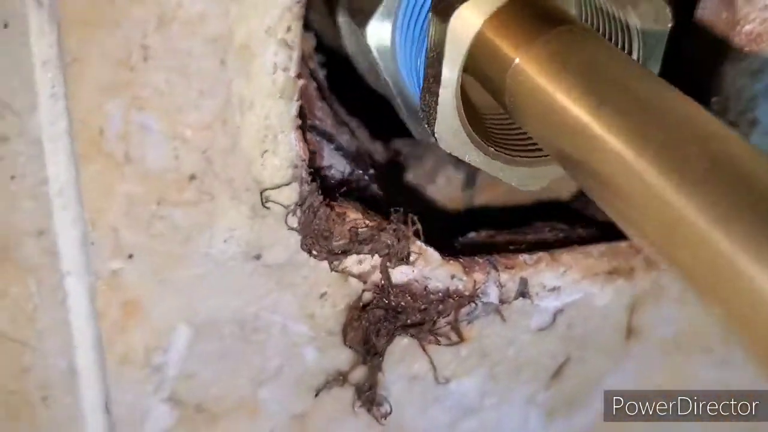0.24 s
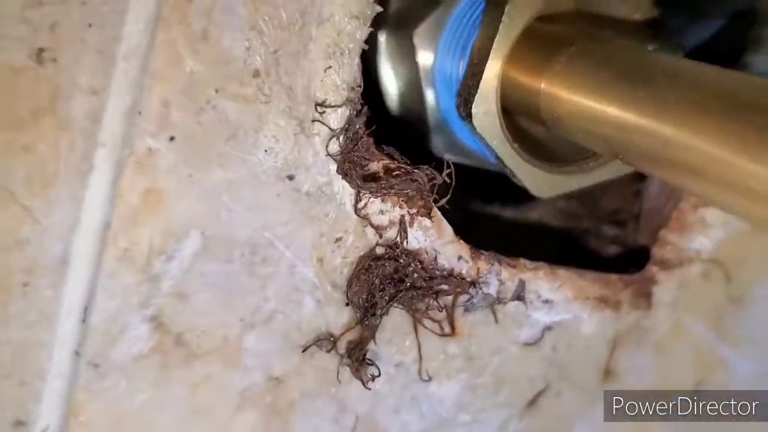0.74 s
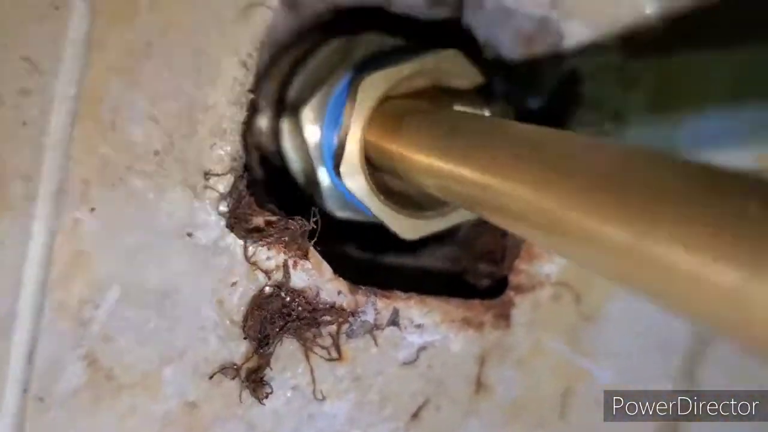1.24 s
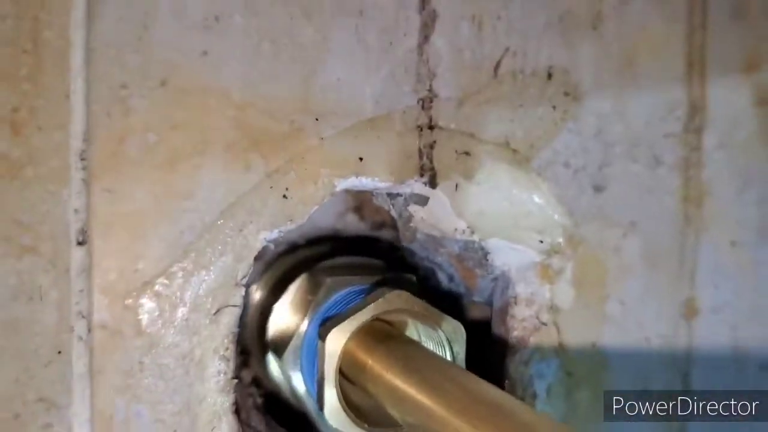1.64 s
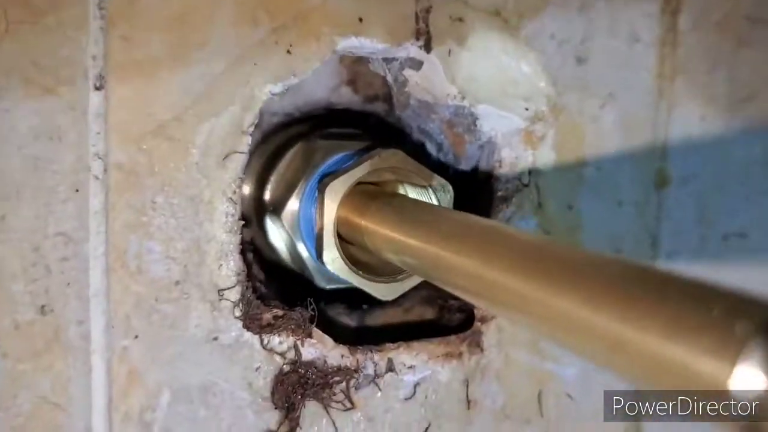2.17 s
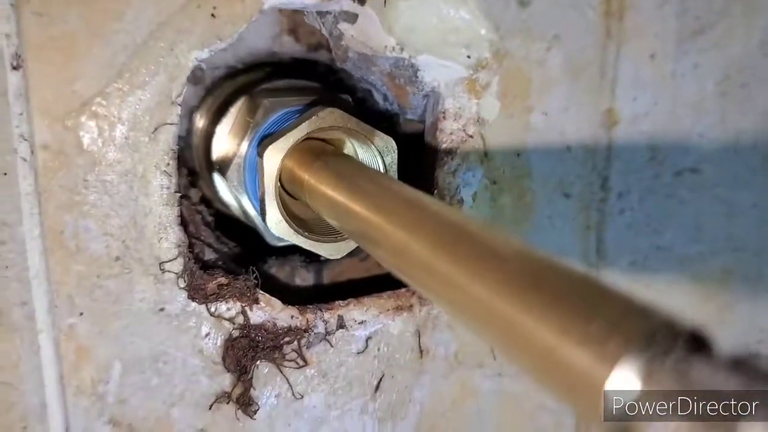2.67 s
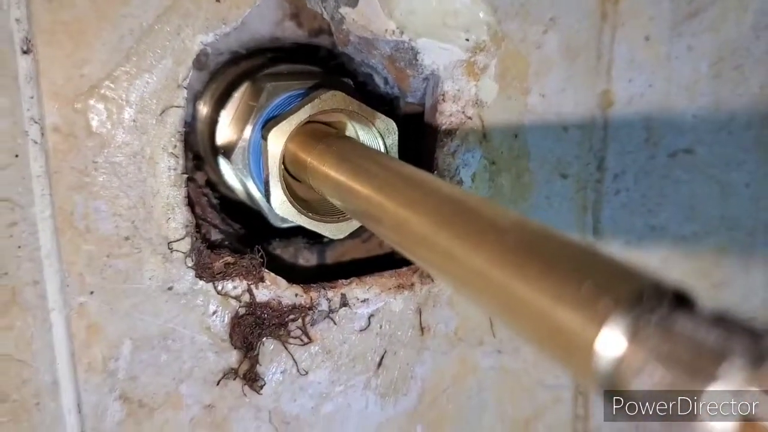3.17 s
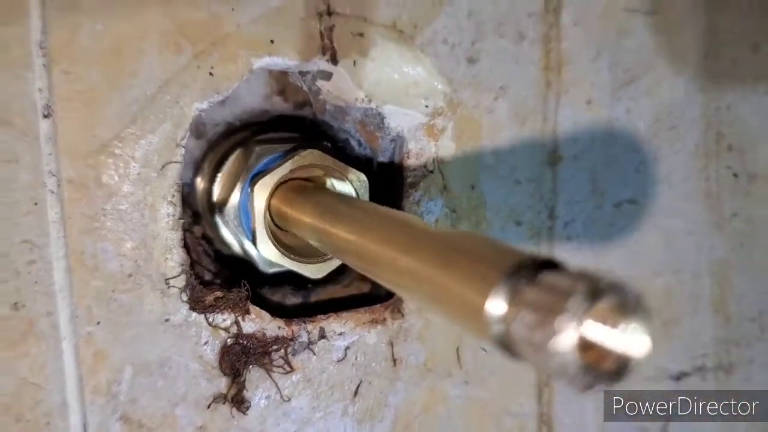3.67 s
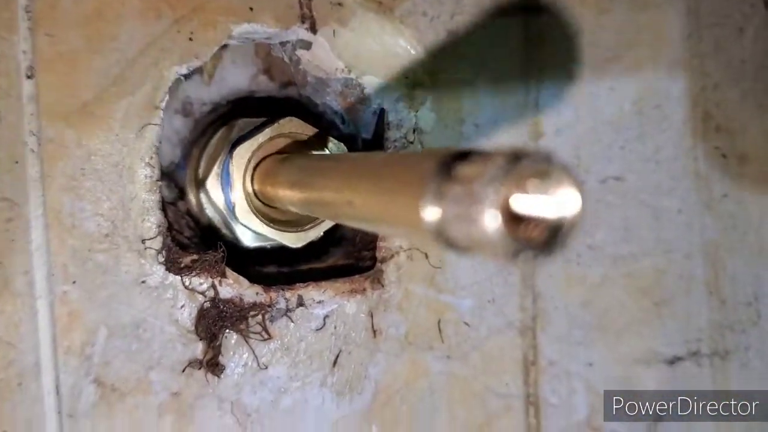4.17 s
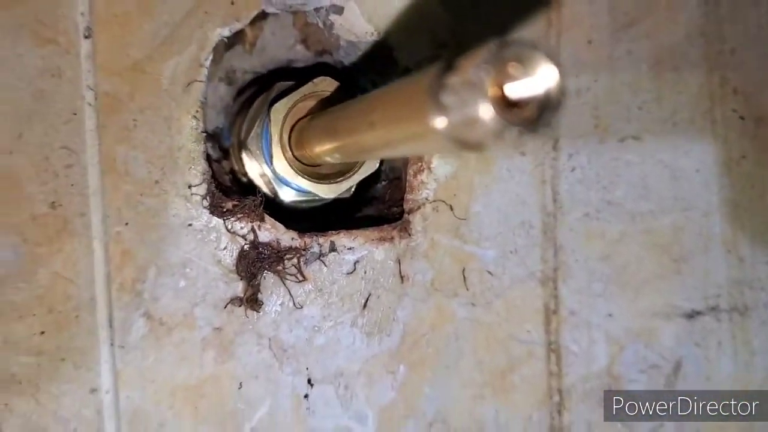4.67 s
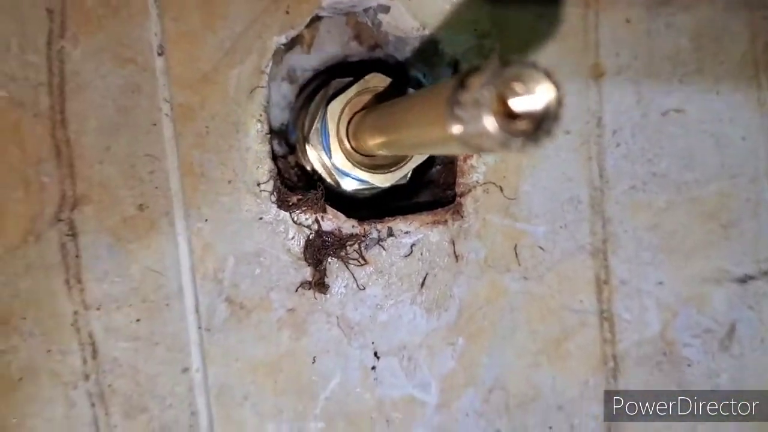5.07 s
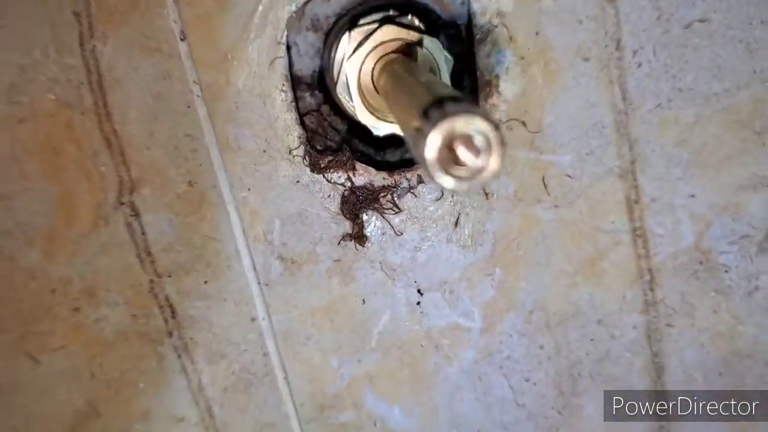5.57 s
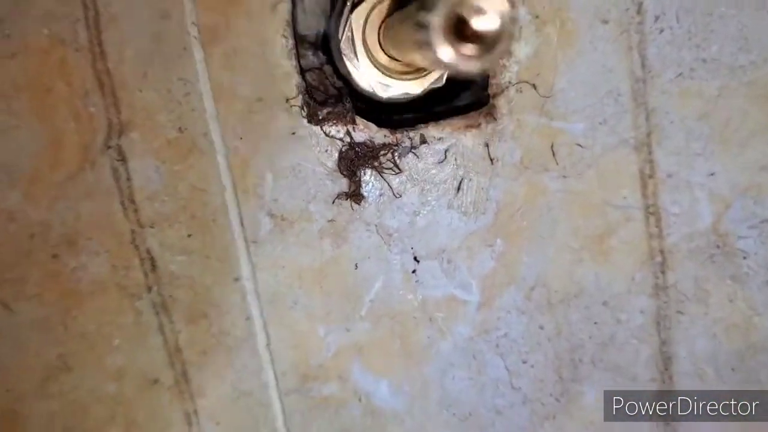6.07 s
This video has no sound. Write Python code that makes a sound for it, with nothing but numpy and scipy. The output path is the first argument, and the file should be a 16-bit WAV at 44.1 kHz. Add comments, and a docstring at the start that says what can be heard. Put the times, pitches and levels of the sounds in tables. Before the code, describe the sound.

A close, steady hiss of water in wall pipes, while a foot shuffles and thumps in a hollow bathtub.

```python
"""A steady hiss of water in the supply pipes behind a tiled bathroom wall, close up on the two
microphones of a hand-held camera; its colour shifts as the camera moves around the pipes.
A thin whistle comes and goes, and the hollow tub hums with the flow. The tub scrapes and booms under
a shuffling foot, thuds under small shifts of weight and groans once near the end.
Right at the microphones, fingers tap and brush the camera body."""
import sys
import numpy as np
from scipy import signal
from scipy.io import wavfile
from scipy.ndimage import uniform_filter1d

SR = 44100
rng = np.random.default_rng(int(sys.argv[2]) if len(sys.argv) > 2 else 0)


def to_wav(s):
    """Save 16-bit WAV."""
    ch = np.atleast_2d(s).T  # columns
    pcm = np.round(np.clip(ch, -1, 1) * 32767)  # PCM
    wavfile.write(sys.argv[1], SR, pcm.astype(np.int16))


N = 278705

# The flow from where the camera is; every pan is left minus right.
# time_s, hiss_db, treble_pan_db, bass_shift_db, whistle_db
FLOW = [(0.0, -33.5, -1, 4, -45.5), (0.37, -32.3, -0.5, 5.5, -47.5), (0.6, -32, -1, 3.5, -42),
        (1.05, -32.5, -1, 3, -43.5), (1.4, -34.5, 0.5, 8, -49), (1.85, -34.5, -2, 8.5, -47.5),
        (2.05, -35.5, 0, 3.5, -52), (2.67, -35, 0, 1, -49), (3.3, -31, -0.5, -0.5, -41),
        (3.7, -30, -2, 0, -45), (4.15, -29, -2, -3.5, -44.5), (4.7, -31, -1.5, 0, -48),
        (5.05, -31.5, 0, 3, -58), (5.45, -32, 3.5, 3, -48), (5.75, -32, 1.5, 0, -50),
        (6.12, -32.5, 3.5, 3, -51), (6.24, -33.5, 0, 6, -39), (6.32, -32.5, 3, -1, -44)]
# Modes of the tub's panel: pitch_hz, width_hz, gain_db
PANEL_MODES = [(296.3, 11, 1.5), (330, 49, -11.5), (403, 110, -11.5), (538, 53, -9), (726, 42, -19)]


def pipe_hiss(patchy_db=1.5, ripple_db=2.5, flicker_db=0.72, knee_hz=1500, direct=0.63, path_turns=0.6):
    """Turbulent water in the pipes: noise whose colour follows the aim of the camera."""
    # Camera path: time_s, aim (0 close to the wall, 1 along the pipe, 2 facing the pipe end)
    camera_path = [(0, 0.33), (.8, 0.42), (1.6, 0.076), (2.5, 0.7), (3.3, 0.48), (4.3, 1.43), (4.9, 1.68),
                   (5.7, 1.9), (6.32, 1.92)]
    # The hiss spectrum from those three positions: frequency_hz, relative_db
    at_wall = [(76, -26), (130, -22), (183, -35), (285, -15.5), (322, -33), (402, -18.5), (601, -27),
               (1400, -21), (1710, -19), (2180, -19), (3070, -13), (5850, -13.5), (9670, -19), (12600, -14),
               (16000, -16)]
    along_pipe = [(76, -23), (130, -5.5), (147, -34), (219, -16), (253, -15.5), (453, -20), (491, -29),
                  (935, -28.5), (1750, -16), (2090, -22.5), (2670, -18), (7440, -12.5), (10100, -23),
                  (12100, -13.5), (16000, -20)]
    at_pipe_end = [(76, -24), (130, -4.5), (176, -23.5), (651, -22), (881, -29), (1710, -17.5),
                   (1970, -23.5), (2720, -12), (2950, -15.5), (4500, -14), (7150, -19), (7750, -17),
                   (8920, -23), (11100, -18), (16000, -21.5)]
    # Pipe and wall cavity resonances, and one dip: pitch_hz, width_hz, gain_db, pan_db
    pipe_modes = [(222.4, 24.5, 12.5, 7), (310.1, 26.7, 13, -3), (451, 56, 6, 8), (1397, 230, 5.5, 0),
                  (1753, 14, 11.5, 14.5), (2246, 19, 7, -9), (2746, 72, 6, 5), (3670, 130, 4, 4.5),
                  (4260, 110, 2.5, 1), (4480, 98, 1.5, 1), (4940, 89, -4, 1), (6105, 33, 2, -4),
                  (6440, 770, 2, -5), (8520, 99, 2.5, 13), (10700, 870, 5, 0.5), (10950, 81, 6.5, 17.5),
                  (11360, 130, 4.5, -12.5), (12240, 330, 5.5, -9)]
    # Balance of the hiss between the microphones: frequency_hz, pan_db
    balance = [(60, 27), (110, -4), (200, -3), (380, 0.5), (700, -5.5), (1290, 2.5), (2380, -3),
               (4400, -3.5), (8120, -0.5), (15000, 0)]
    # How alike the two microphones hear it: frequency_hz, correlation
    likeness = [(60, 0.16), (130, 0.98), (290, 0.74), (640, 0.086), (1410, -0.22), (3100, -0.32),
                (6820, 0.07), (15000, 0.15)]
    frames = N // 512 + 5
    t = np.arange(frames) * 512 / SR
    hz = np.fft.rfftfreq(2048, 1 / SR)[:, None]
    time_s, hiss_db, treble_pan_db, bass_shift_db, _ = np.transpose(FLOW)
    a, b, c, d = rng.standard_normal((frames, 1025, 4)).T
    left, unrelated = a + 1j * b, c + 1j * d
    patches = smooth_field(frames, bins_wide=24, frames_long=16)
    ripples = smooth_field(frames, bins_wide=3, frames_long=120)  # tile echoes interfere: lasting peaks
    paths = smooth_field(frames, bins_wide=30, frames_long=150)[0]  # path difference to the mics drifts
    aim = np.interp(t, *np.transpose(camera_path))
    views = enumerate((at_wall, along_pipe, at_pipe_end))
    colour_db = sum(np.maximum(1 - abs(aim - k), 0) * curve_at(view, hz) for k, view in views)
    pan_db = curve_at(balance, hz)
    for pitch_hz, width_hz, gain_db, mode_pan_db in pipe_modes:
        peak = 1 / (1 + (2 * (hz - pitch_hz) / width_hz) ** 2)
        colour_db += gain_db * peak
        pan_db += mode_pan_db * peak
    top = (hz > 3500) & (hz < 15000)
    colour_db -= 10 * np.log10((top * amp(2 * colour_db)).sum(0))  # equal top-end power at every aim
    treble = 1 / (1 + (knee_hz / (hz + 1)) ** 2)
    colour_db += (1 - treble) * np.interp(t, time_s, bass_shift_db)
    texture_db = patchy_db * patches + ripple_db * ripples + flicker_db * rng.standard_normal(frames)
    pan_db = pan_db + treble * np.interp(t, time_s, treble_pan_db)
    path_phase = np.exp(2j * np.pi * path_turns * paths)
    coherence = (1 - treble) * curve_at(likeness, hz) + treble * direct * path_phase
    right = coherence * left + np.sqrt(np.clip(1 - abs(coherence) ** 2, 0, 1)) * unrelated
    spectra = np.array([left, right]) * amp(colour_db + texture_db) * sides(pan_db)
    hiss = signal.istft(spectra, nperseg=2048, noverlap=1536)[1][:, :N]
    return amp(np.interp(np.arange(N) / SR, time_s, hiss_db)) * unit_rms(hiss)


def pipe_whistle(pitch_hz=7647, waver_db=1, pan_db=-8.5):
    """One narrow pipe resonance sings in the flow, coming and going."""
    time_s, *_, whistle_db = np.transpose(FLOW)
    tone = ring(rng.standard_normal((2, N)), [(pitch_hz, 160, 0)])
    tone = unit_rms(ring(tone, [(pitch_hz, 250, 0)]))
    level_db = np.interp(np.arange(N) / SR, time_s, whistle_db) + waver_db * waver(span=3000)
    return amp(level_db) * tone * sides(pan_db)[:, None]


def foot_scrapes(mix, land_s=0.025, tail_s=0.11, tail_db=-19.5, grit_db=1.5, correlation=-0.19):
    """A sole lands, drags over the tub and lifts; tub and room keep a faint tail."""
    # Strokes of the sole: start_s, length_s, bright_db, hollow_db, panel_db, pan_db
    strokes = [(1.311, 0.098, -27.5, -26.5, -20.5, -7), (1.448, 0.14, -24, -35, -34.5, -9)]
    # Tub resonances in the bright and the hollow part of the scrape: pitch_hz, width_hz, gain_db
    bright_modes = [(1480, 150, 1.5), (1790, 150, 2.5), (2195, 120, 6), (2340, 71, 4), (2904, 97, 6)]
    hollow_modes = [(788, 30, 5), (860, 53, -11), (1060, 76, -3), (1330, 105, 2)]
    hollow_db_per_s, panel_db_per_s, lift_db_per_s = -77, -140, -420
    for start_s, length_s, bright_db, hollow_db, panel_db, pan_db in strokes:
        t = np.arange(0, length_s + tail_s, 1 / SR)
        landing_db = -20 * np.maximum(1 - t / land_s, 0) ** 2
        landed_s, lifted_s = np.maximum(t - land_s, 0), np.maximum(t - 0.98 * length_s, 0)
        bright_db += np.maximum(-13.5 * abs(2 * t / length_s - 1) ** 1.65, tail_db)  # swells and sinks
        fade_db = hollow_db_per_s * landed_s + lift_db_per_s * lifted_s
        hollow_db += landing_db + np.maximum(fade_db, tail_db)
        panel_db += landing_db + panel_db_per_s * landed_s
        grit = amp(grit_db * unit_rms(uniform_filter1d(rng.standard_normal(SR // 2), 90)))
        a, b, c, d = (rng.standard_normal((4, SR // 2)) * grit)[:, :len(t)]
        friction = np.array([a, correlation * a + (1 - abs(correlation)) * b])
        shaking = np.array([c + 0.43 * d, c - 0.35 * d])
        bright = amp(bright_db) * unit_rms(band(ring(friction, bright_modes), 1400, 3140, order=6))
        hollow = amp(hollow_db) * unit_rms(band(ring(friction, hollow_modes), 790, 1650))
        panel = amp(panel_db) * unit_rms(band(ring(shaking, PANEL_MODES), 178, 440))
        scrape = bright * sides(pan_db)[:, None] + hollow * sides(pan_db - 2.5)[:, None] + panel
        add(mix, start_s, scrape * signal.windows.tukey(len(t), 0.05))


def floor_booms(mix, rise_s=0.013, fall_s=0.018, sag_db=-8.5):
    """The tub floor booms in jerks under the foot, lower as it is loaded, alike at both microphones."""
    # Jerks of the floor: start_s, length_s, pitch_hz, glide_hz_per_s, level_db
    jerks = [(1.336, 0.074, 111.5, -110, -5.5), (1.405, 0.053, 118, -150, -10),
             (1.462, 0.064, 108.7, -450, -7), (1.518, 0.078, 81, -200, -10), (1.608, 0.09, 69.5, 15, -23.5)]
    for start_s, length_s, pitch_hz, glide_hz_per_s, level_db in jerks:
        t = np.arange(0, length_s, 1 / SR)
        edges = np.clip(np.minimum(t / rise_s, (length_s - t) / fall_s), 0, 1)
        envelope = np.sin(np.pi / 2 * edges) * amp(level_db + sag_db * t / length_s)
        add(mix, start_s, envelope * np.sin(2 * np.pi * (pitch_hz + glide_hz_per_s * t / 2) * t))


def tub_thuds(mix, boom_hz=110.2):
    """Shifts of weight land as soft blows: a short scuff rings the panel over a low boom."""
    # Blows on the tub: time_s, level_db, pan_db, boom_db, brightness_db
    blows = [(0.345, -29, -13, -34, -12), (1.112, -21.5, 4, -23.5, -8), (2.092, -41.5, 4, -33, 14.5),
             (2.187, -36.5, 0, -35, 4), (2.255, -39, -6, -28.5, -6), (2.368, -33, 2, -43, -23),
             (5.039, -40, -1, -44, -6), (5.086, -23, -6.5, -23.5, -2), (5.214, -35.5, -7, -37, -15),
             (5.316, -30, -5, -25, -12), (5.44, -28, -5, -20.5, -2), (5.619, -49, -13, -35, -8)]
    t = np.arange(6000) / SR
    for time_s, level_db, pan_db, boom_db, brightness_db in blows:
        scuff = rng.standard_normal((2, len(t))) * (1 - np.exp(-t / 0.001)) * np.exp(-t / 0.015)
        panel = ring(scuff.mean(0), PANEL_MODES)
        contact = band(scuff, 250, 4200, order=2)
        blow = panel / abs(panel).max() + amp(brightness_db) * contact / abs(contact).max()
        boom = amp(boom_db) * np.sin(2 * np.pi * boom_hz * t) * np.exp(-t / 0.03)
        add(mix, time_s - 0.002, amp(level_db) * blow * sides(pan_db)[:, None] + boom)


def finger_taps(mix):
    """Taps on the camera click and rattle at both microphones; the right gets case ring and a push."""
    # Fingertips on the body: start_s, left_click_db, right_click_db, case_db, push_db
    taps = [(0.2709, -14, -19, -21, -26), (0.2767, -1, -10, -8.5, -12.5), (0.9835, -2.5, -3, -3, -6),
            (.991, -11, -25, -31, -13)]
    t = np.arange(3000) / SR
    bright_click = np.sin(2 * np.pi * 2400 * t) * np.exp(-((t - 0.00036) / 0.00017) ** 2)
    dull_click = np.sin(2 * np.pi * 1250 * t) * np.exp(-((t - 0.0006) / 0.00022) ** 2)
    case = np.sin(2 * np.pi * 590 * (t - 0.0008)) * np.exp(-t / 0.0024) * (1 - np.exp(-t / 0.0006))
    push = np.sin(2 * np.pi * 63 * t) * np.exp(-((t - 0.014) / 0.0066) ** 2)  # slow pressure pulse
    for start_s, left_click_db, right_click_db, case_db, push_db in taps:
        rattle = rng.standard_normal((2, len(t))) * np.exp(-t / 0.0047)
        left = amp(left_click_db) * (bright_click + band(0.35 * rattle[0], 720, 3900))
        right = amp(right_click_db) * (dull_click + band(0.045 * rattle[1], 240, 3500, order=3))
        right += amp(case_db) * case + amp(push_db) * push
        add(mix, start_s, np.array([left, right]))


def finger_brushes(mix):
    """Skin slides past a microphone port: short swells of rough noise."""
    # Passes of a finger: peak_s, level_db, centre_hz, low_hz, high_hz, length_s, pan_db
    brushes = [(4.672, -44, 900, 400, 1500, 0.026, 0), (4.796, -37.5, 700, 292, 4030, 0.045, -23),
               (6.014, -28.5, 1960, 1390, 3300, 0.014, 21), (6.071, -36, 2080, 990, 3200, 0.017, 11)]
    t = np.arange(-3000, 3000) / SR
    for peak_s, level_db, centre_hz, low_hz, high_hz, length_s, pan_db in brushes:
        rub = ring(rng.standard_normal((2, len(t))), [(centre_hz, 900, 0)])
        rub = unit_rms(band(rub, low_hz, high_hz, order=3))
        swell = np.exp(-abs(2 * t / length_s) ** 1.6)
        add(mix, peak_s + t[0], amp(level_db) * rub * swell * sides(pan_db)[:, None])


def panel_groan(length_s=0.384, first_hz=292.3, settled_hz=274, settle_s=0.043, roughness=0.41):
    """Slow uneven slip keeps one panel mode sounding; its pitch settles as it fades."""
    t = np.arange(0, length_s, 1 / SR)
    pitch_hz = settled_hz + (first_hz - settled_hz) * np.exp(-t / settle_s)
    level_db = -42 - 6.5 * t / length_s + 2 * waver(span=600)[:len(t)]
    noise = unit_rms(band(rng.standard_normal(SR), 274, 320, order=2))[:len(t)]
    tone = np.sqrt(2) * np.sin(2 * np.pi * np.cumsum(pitch_hz) / SR) + roughness * noise
    return amp(level_db) * tone * signal.windows.tukey(len(t), 0.2)


def tub_hum(offset_db=-5.5):
    """The flow shakes the tub's lowest modes, alike at both microphones."""
    # Low modes of the tub: pitch_hz, width_hz, gain_db
    tub_modes = [(69.05, 5.1, 6.5), (105.1, 11.5, 3.5), (115.2, 6.8, 1.5)]
    hum = ring(ring(rng.standard_normal(N), tub_modes), [(76, 41.4, 0)])
    return amp(flow_db(bass_share=0.36) + offset_db) * unit_rms(low_cut(hum, 55))


def low_rumble(offset_db=-15, waver_db=3):
    """One deep resonance follows the flow and also swells on its own, alike at both microphones."""
    deep = band(ring(rng.standard_normal(N), [(58.7, 8.8, 0)]), 49, 62.7, order=2)
    swell_db = waver_db * waver(span=8000)
    return amp(flow_db(bass_share=-0.43) + offset_db + swell_db) * unit_rms(deep)


def flow_db(bass_share):
    """The hiss level plus a share of its bass shift, sample by sample."""
    time_s, hiss_db, _, bass_shift_db, _ = np.transpose(FLOW)
    return np.interp(np.arange(N) / SR, time_s, hiss_db + bass_share * bass_shift_db)


def amp(db):
    return 10 ** (np.asarray(db) / 20)


def unit_rms(x):
    return x / np.sqrt(np.mean(x ** 2) + 1e-20)


def curve_at(points, hz):
    """Interpolates (frequency_hz, value) points on a log frequency axis."""
    point_hz, value = np.transpose(points)
    return np.interp(np.log(hz + 1), np.log(point_hz + 1), value)


def sides(pan_db):
    """Left and right gains, pan_db apart."""
    return amp(np.array([pan_db / 2, -pan_db / 2]))


def add(mix, start_s, sound):
    part = mix[:, round(start_s * SR):][:, :sound.shape[-1]]
    part += sound[..., :part.shape[1]]


def ring(x, modes):
    """Passes x through parallel resonances: pitch_hz, width_hz, gain_db."""
    out = 0
    for pitch_hz, width_hz, gain_db in modes:
        pole = np.exp((2j * np.pi * pitch_hz - np.pi * width_hz) / SR)
        out = out + amp(gain_db) * 2 * signal.lfilter([1 - abs(pole)], [1, -pole], x).real
    return out


def band(x, low_hz, high_hz, order=4):
    return signal.sosfilt(signal.butter(order, [low_hz, high_hz], "band", fs=SR, output="sos"), x)


def low_cut(x, hz):
    return signal.sosfilt(signal.butter(2, hz, "high", fs=SR, output="sos"), x)


def smooth_field(frames, bins_wide, frames_long):
    """Random values for each channel, smooth over frequency and time."""
    x = rng.standard_normal((frames, 1025, 2)).T
    return unit_rms(uniform_filter1d(uniform_filter1d(x, bins_wide, 1), frames_long, 2))


def waver(span):
    """Slow random drift, smoothed over span samples."""
    return unit_rms(uniform_filter1d(uniform_filter1d(rng.standard_normal(N), span), span))


def scene():
    """Running water throughout, with the foot in the tub and the handling noise on top."""
    mix = pipe_hiss() + pipe_whistle() + tub_hum() + low_rumble()
    foot_scrapes(mix)
    floor_booms(mix)
    tub_thuds(mix)
    finger_taps(mix)
    finger_brushes(mix)
    add(mix, start_s=5.58, sound=panel_groan())
    return mix


def record(dry):
    """The camera's microphones lose the deepest bass, and the top of the band ends steeply."""
    band_limit = signal.firwin(511, 15560, window=("kaiser", 9), fs=SR)
    return signal.oaconvolve(low_cut(dry, 40), band_limit[None], "same")


dry = scene()
out = record(dry)
to_wav(out)
```